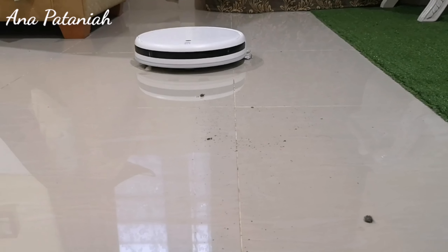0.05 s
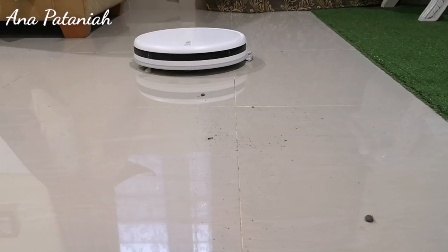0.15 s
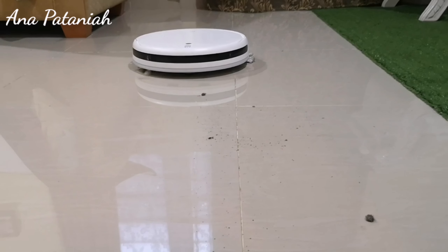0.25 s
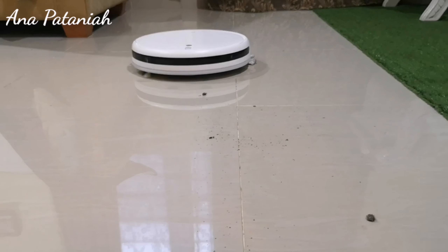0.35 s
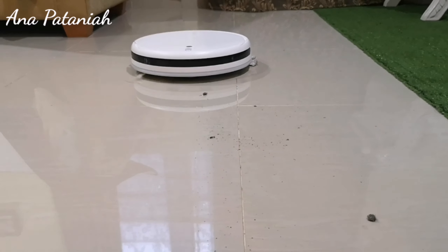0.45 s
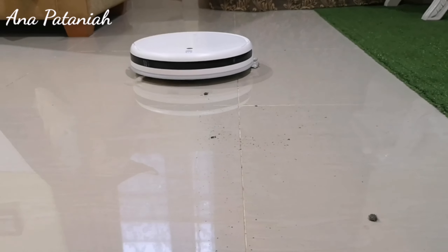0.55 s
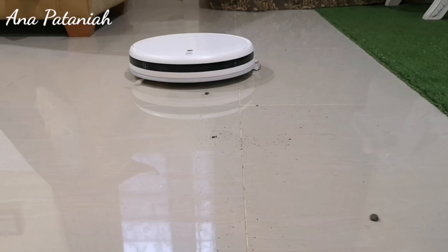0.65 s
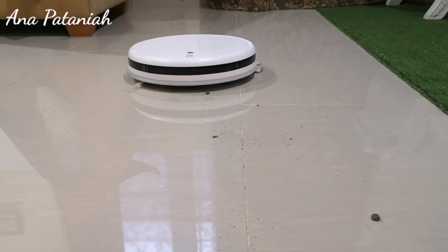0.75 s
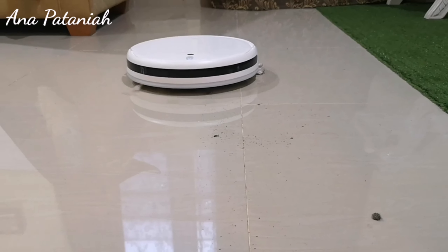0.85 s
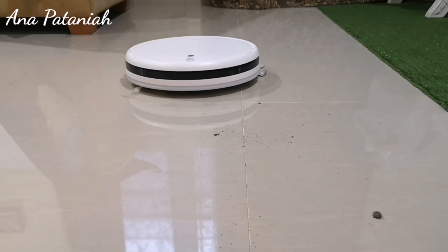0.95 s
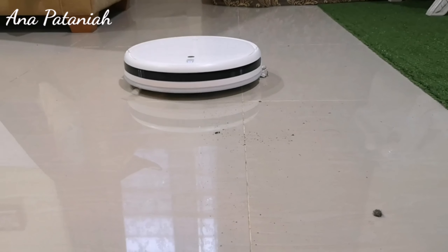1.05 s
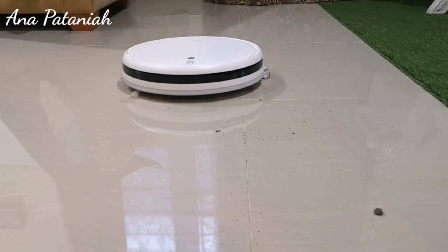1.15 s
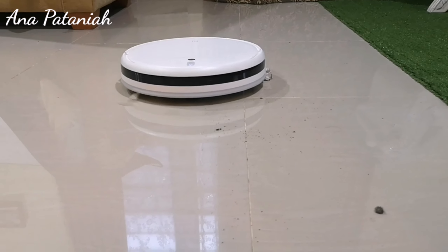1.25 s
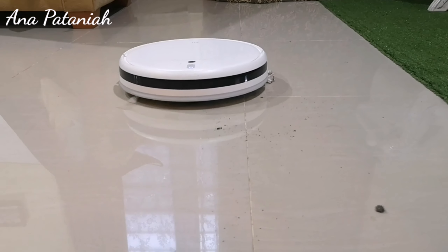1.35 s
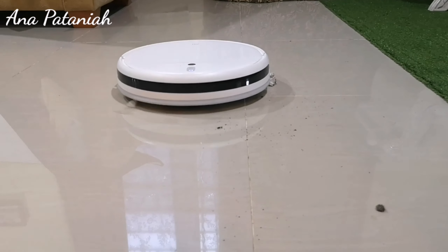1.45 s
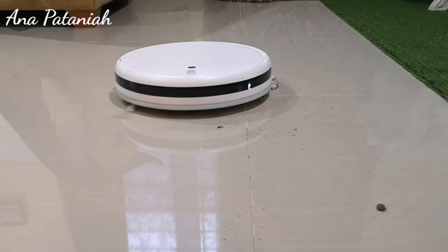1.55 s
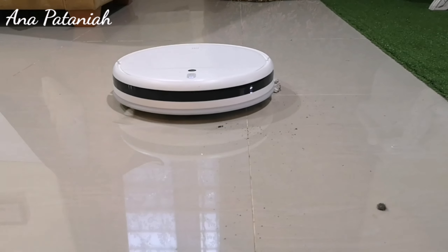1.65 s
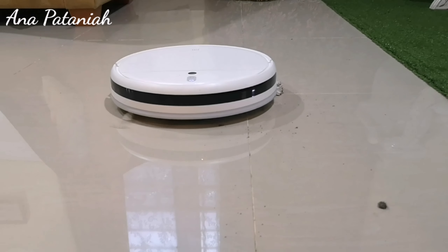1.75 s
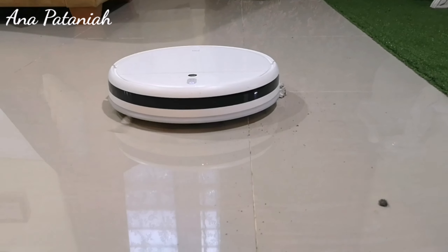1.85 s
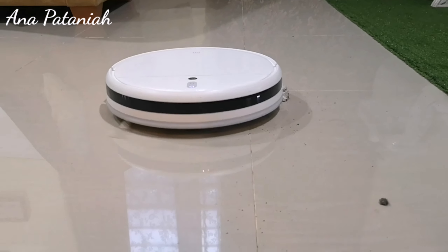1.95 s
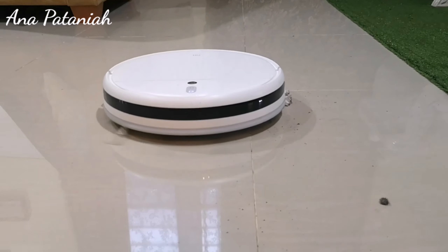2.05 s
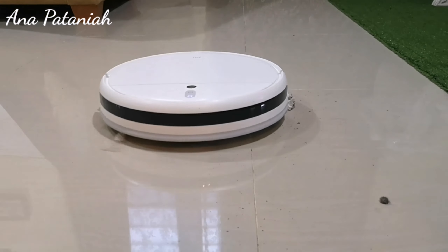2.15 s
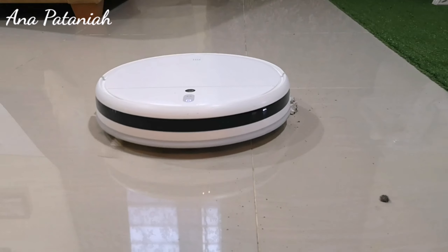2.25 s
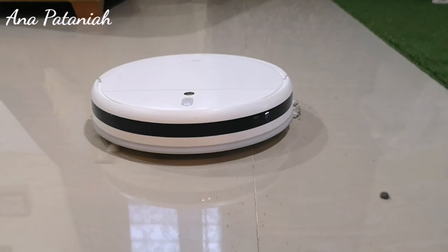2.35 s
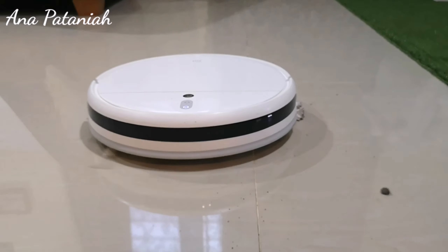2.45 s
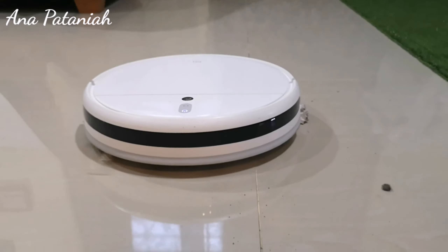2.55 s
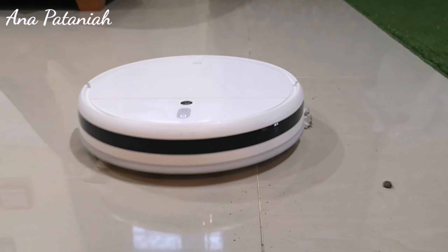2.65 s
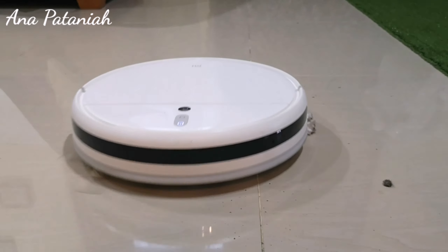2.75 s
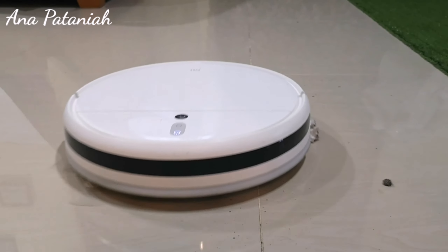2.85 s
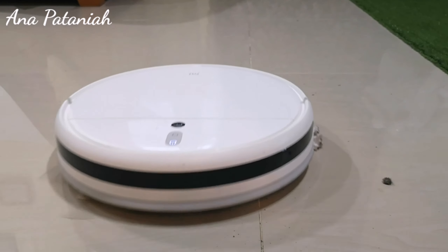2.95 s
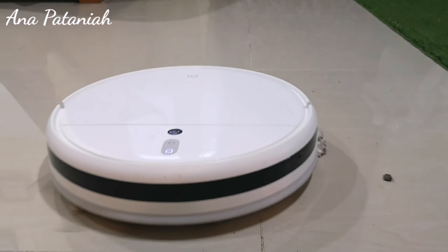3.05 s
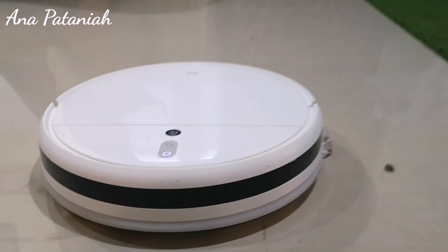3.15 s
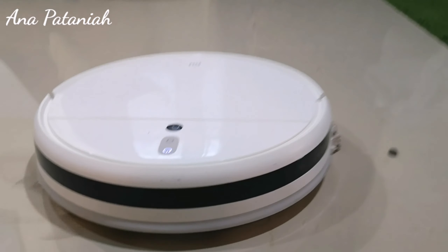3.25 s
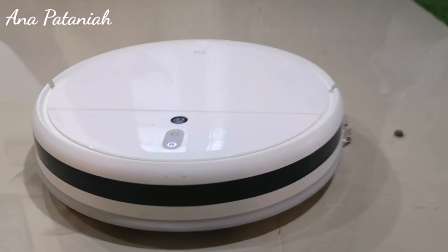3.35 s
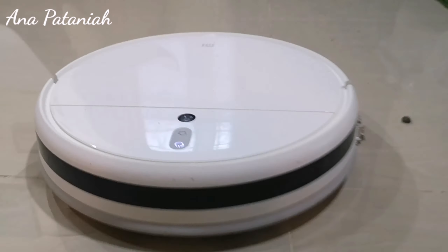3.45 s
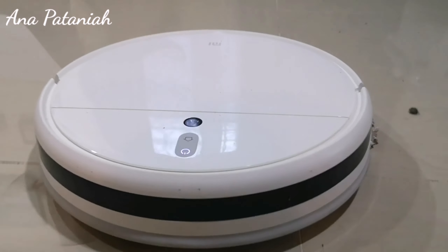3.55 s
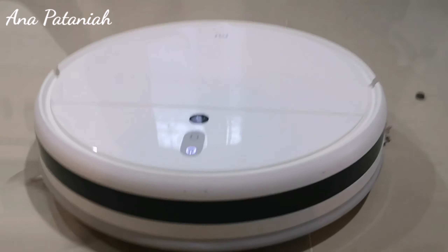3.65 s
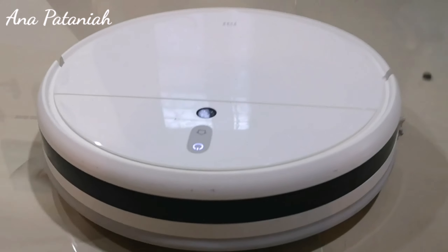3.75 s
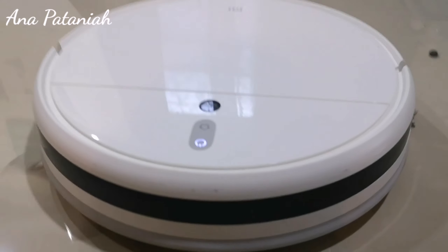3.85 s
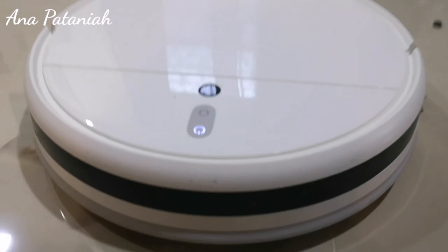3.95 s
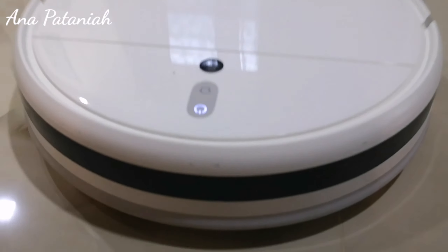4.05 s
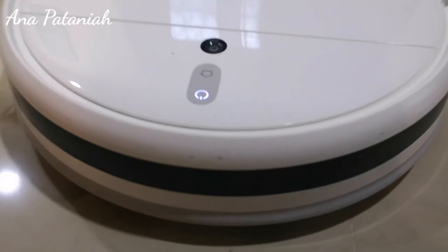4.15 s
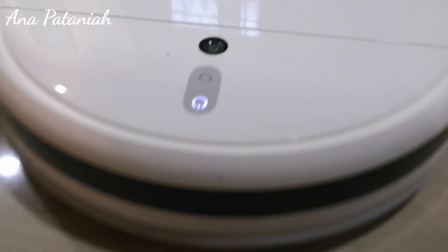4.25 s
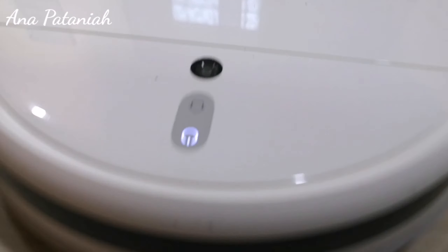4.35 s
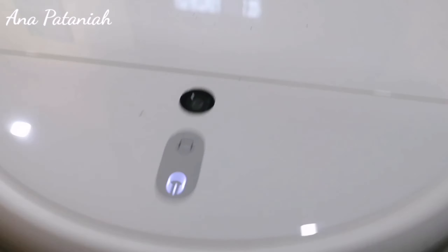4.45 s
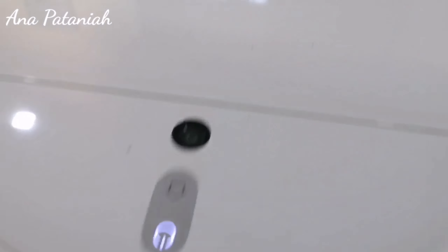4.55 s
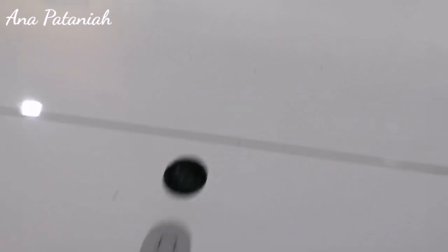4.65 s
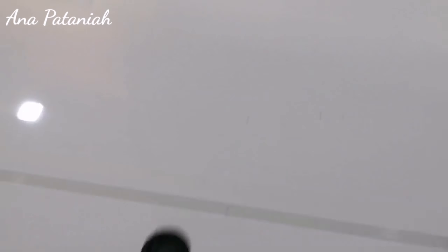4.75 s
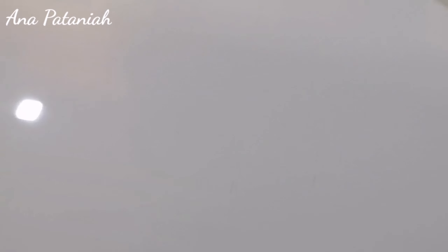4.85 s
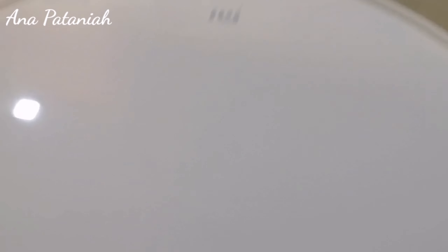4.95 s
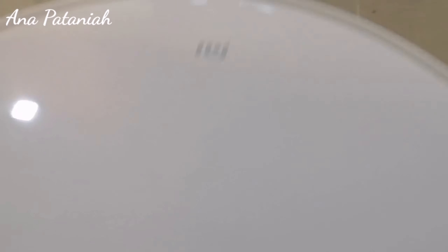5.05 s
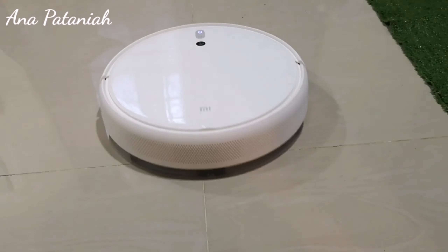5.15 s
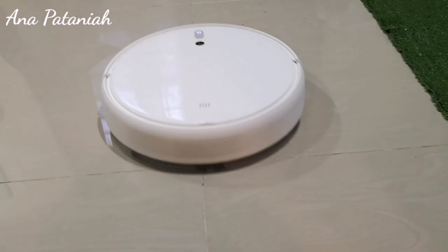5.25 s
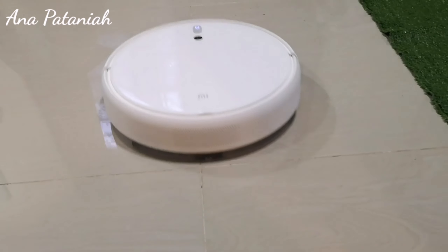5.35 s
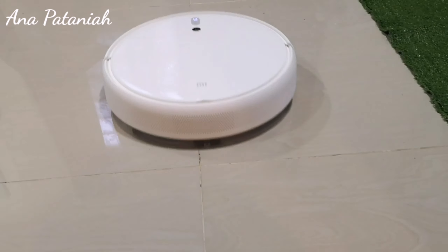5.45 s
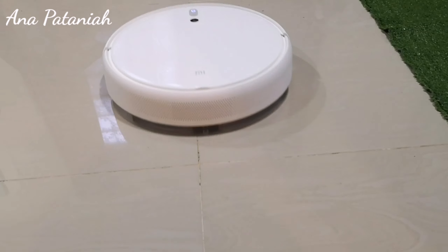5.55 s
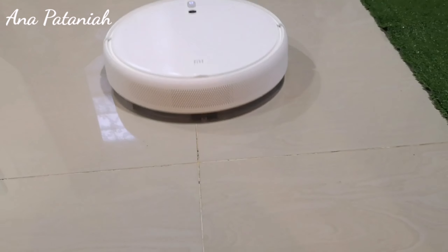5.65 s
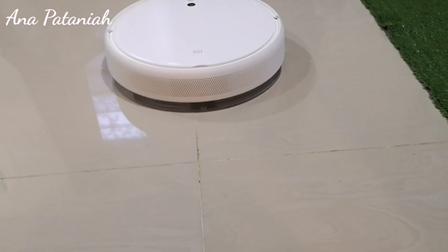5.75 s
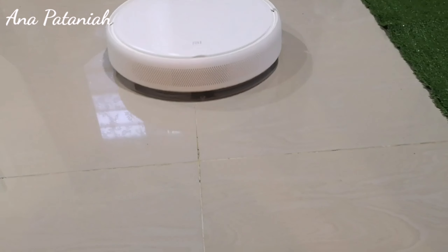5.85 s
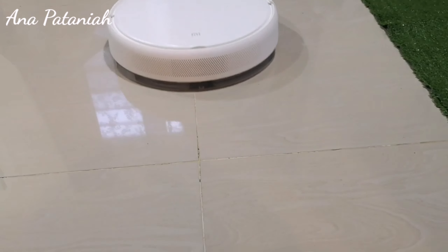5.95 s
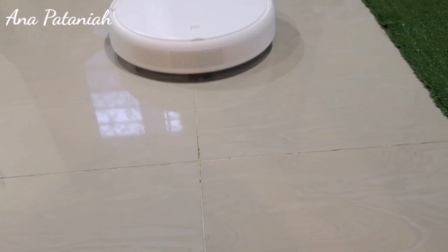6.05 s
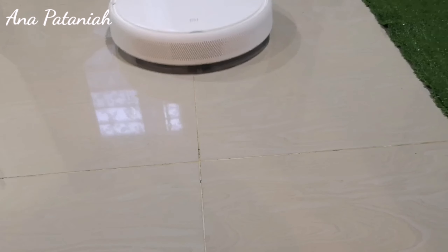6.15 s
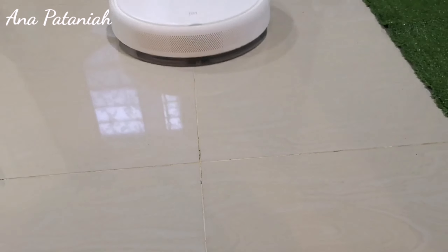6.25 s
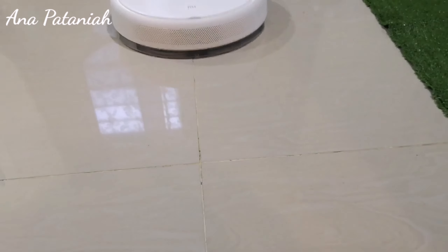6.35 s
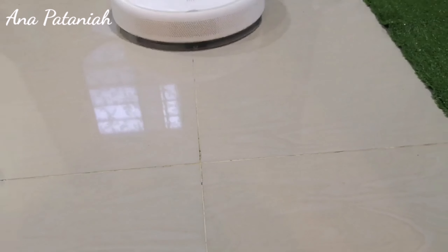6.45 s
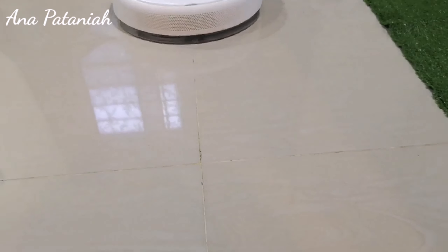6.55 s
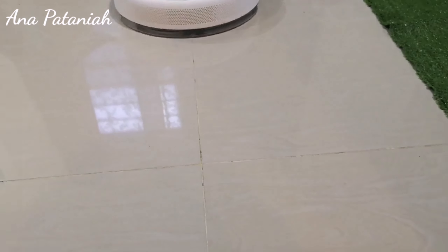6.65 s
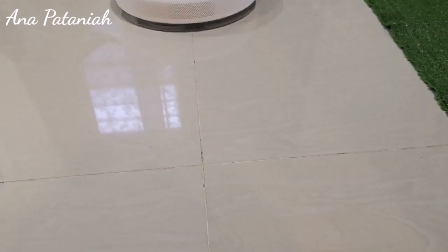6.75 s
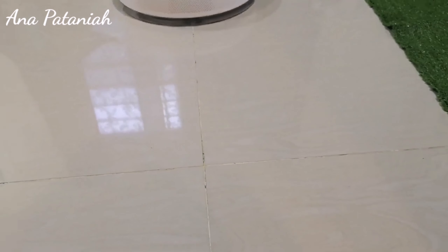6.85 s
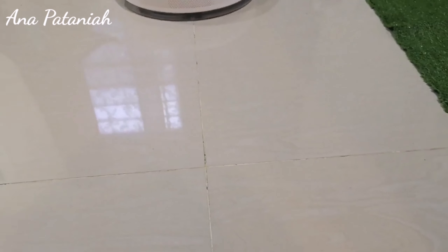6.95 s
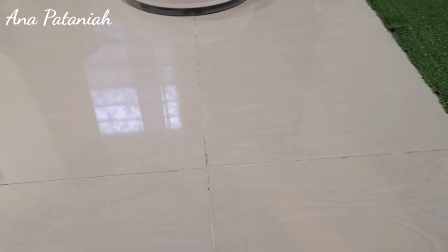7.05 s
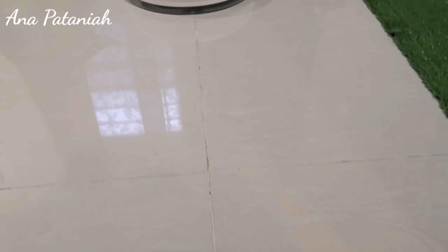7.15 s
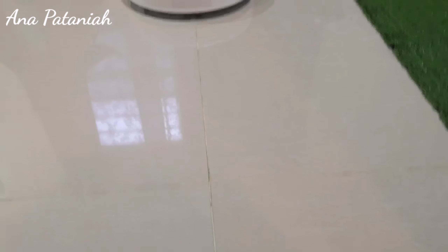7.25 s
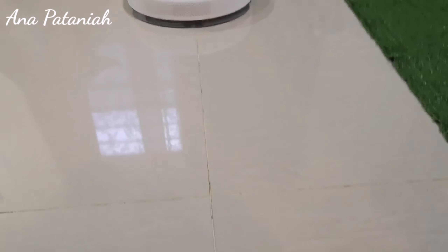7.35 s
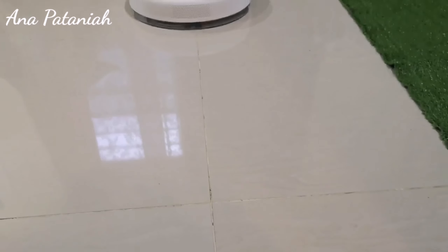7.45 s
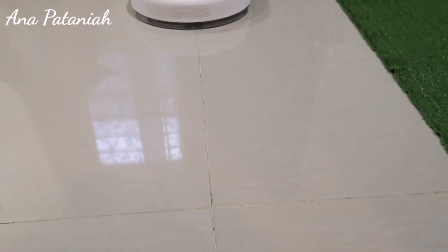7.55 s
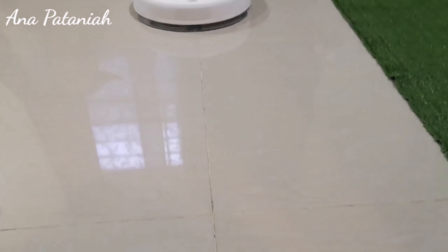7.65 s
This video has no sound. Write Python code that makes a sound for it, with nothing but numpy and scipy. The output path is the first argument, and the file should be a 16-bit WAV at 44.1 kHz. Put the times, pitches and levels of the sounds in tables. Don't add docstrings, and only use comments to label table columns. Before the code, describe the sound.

A robot vacuum rolls across a tiled room towards a hand-held phone. Its thin, high gear whine, low airy roar and soft bristle hiss grow steadily louder, with small grit ticks and one sharp knock midway. It passes close beneath, then the sound fades fast to a short silence. It returns abruptly, slightly lower in pitch and softer, moving off.

```python
import sys
import numpy as np
from scipy import signal
from scipy.fft import rfft, irfft, next_fast_len
from scipy.io import wavfile
from scipy.ndimage import uniform_filter1d

SR = 44100
rng = np.random.default_rng(int(sys.argv[2]) if len(sys.argv) > 2 else 0)


def pcm_store(signal):
    levels = np.round(np.clip(np.atleast_2d(signal), -1, 1) * 32767)
    wavfile.write(sys.argv[1], SR, levels.astype(np.int16).T)


def attenuation_scalar(level_db):
    decades = np.asarray(level_db, float) / 20
    return 10 ** decades


N = 340011
STEP = 64
SLOW = np.arange(0, N + STEP, STEP)
MUTE_S = 5.365


def walk(rate):
    k = max(int(SR / rate / STEP), 1)
    steps = np.repeat(rng.standard_normal(len(SLOW) // k + 1), k)
    smooth = uniform_filter1d(uniform_filter1d(steps, k), k)
    return 1.3 * smooth[:len(SLOW)]


def curves(tables):
    s, *columns = np.concatenate(tables).T
    return [np.interp(SLOW / SR, s, c) for c in columns]


def on_log(table, hz):
    f, v = np.transpose(table)
    return np.interp(np.log(hz), np.log(f), v)


def fine(slow, span=slice(0, N)):
    between = np.arange(STEP) / STEP
    return (slow[:-1, None] + np.diff(slow)[:, None] * between).ravel()[span]


def spin(table, hunt, rate):
    hz = curves([table])[0] * (1 + hunt * walk(rate))
    return np.cumsum(fine(hz)) / SR


def by_view(pair):
    return np.where(SLOW < MUTE_S * SR, *pair)


def swells(rows):
    return sum(db * np.exp(-.5 * ((SLOW / SR - s) / long) ** 2) for s, db, long in rows)


# t/s, distance/m, left minus right level/dB
PATH_OF_MACHINE = [
    [(0, 1.47, -1), (1.2, 0.98, -1.5), (1.45, 0.97, -2.5), (1.8, 0.7, -4), (2.4, 0.75, -3.5),
     (3.45, 0.52, -2), (3.6, 0.57, -2.5), (4.0, 0.46, -4.5), (4.1, 0.53, -3.5), (4.6, 0.43, -3),
     (5.28, 0.38, -3.5)],
    [(5.56, 0.81, 0), (5.8, 0.74, 1.5), (6.6, 0.91, 2.5), (7.71, 1.23, 3.5)],
]


def nearness():
    return -20 * np.log10(np.maximum(curves(PATH_OF_MACHINE)[0], .1))


def tone(turns, db, pan_db, wobble_db=0.5, blur=0.18, across=0.24):
    lean = np.tanh(pan_db * np.log(10) / 40 + 1.2 * across * walk(1.2))
    side = lean + 1j * across * np.sqrt(1 - lean ** 2)
    level = np.sqrt(2) * attenuation_scalar(db + wobble_db * walk(4.05))
    mid = level * np.exp(1j * (2 * np.pi * rng.random() + blur * walk(12)))
    carrier = np.exp(2j * np.pi * turns)
    return np.array([(fine(g) * carrier).imag for g in (mid * (1 + side), mid * (1 - side))])


def hum():
    return tone(48.5 * np.arange(N) / SR, -66.0, 0, 2.5, .4, .05)


# delay/ms, drift/ms, gain
EARLY_ECHOES = [
    (1.9, .3, .13),
    (3.1, .6, .16),
    (5.3, .9, .18),
]


def echoes(x):
    now = np.arange(N)
    out = x.copy()
    bright = x - uniform_filter1d(x, size=48)
    for ms, drift_ms, gain in EARLY_ECHOES:
        then = now - fine(ms + drift_ms * walk(0.5036)) * SR / 1000
        out += gain * np.array([np.interp(then, now, port) for port in bright])
    return out / np.sqrt(1 + sum(e[2] ** 2 for e in EARLY_ECHOES))


# f/Hz, side level under mid/dB
NOISE_WIDTH = [
    [(60, -30.5), (110, -25), (200, -15.5), (380, -3), (700, -0.5), (1290, -7.5), (2380, 2), (4400, -1),
     (8120, 0.5), (15000, 0)],
    [(60, -36), (110, -28.5), (200, -27), (380, -5), (700, -1.5), (1290, -11), (2380, -3), (4400, 1.5),
     (8120, 2.5), (15000, 1)],
]
# f/Hz, left minus right level/dB
NOISE_LEAN = [
    [(60, -1), (110, 0.5), (200, -0.5), (380, 3), (700, 9), (1290, -1.5), (2380, -2), (4400, -3.5),
     (8120, 2), (15000, -44.5)],
    [(60, 4), (110, 0), (200, -0.5), (380, 2), (700, 7), (1290, -0.5), (2380, -2.5), (4400, -0.5),
     (8120, 10), (15000, -11.5)],
]
# f/Hz, level/dB gained per dB of nearness, level/dB gained as the exhaust swings past
NOISE_PARTS = [(90, 0.54, -2), (298, 1.25, 6), (516.5, 0.85, -0.5), (1300, 1.02, 1), (2200, 0.71, 4),
               (3340, 0.58, 3), (4980, 1.13, -4.5), (12050, 0.73, 1.5)]
# t/s, f/Hz, level/dB, length/s
NOISE_PATCHES = [(0.6, 2500, 5, 0.14), (1.9, 1700, 6, 0.14), (2.4, 7900, 2, 0.36), (4.598, 1040, -8.5, 0.2),
                 (4.7, 6000, 4.5, 0.27), (4.7, 1610, -6.5, 0.13), (4.65, 2300, 3.5, .12),
                 (5.22, 1900, 1, .08), (5.85, 800, -3, .15), (4.7, 3000, 2.5, .1), (7.05, 3100, 3, 0.28),
                 (6.17, 2400, 1.5, .07), (6.5, 2400, 2.5, 0.077), (7.1, 800, 4, 0.18), (4.9, 1030, 5, .12),
                 (7.6, 1020, -3, .1), (7.0, 1840, 2.5, .4), (1.4, 2100, 3, 0.48), (3.9, 8200, -2.5, .06),
                 (5.2, 3230, 5, .12), (2.95, 1593, -1, 0.095), (1.5, 790, 8, 0.099), (4.1, 1200, -4.5, 0.18),
                 (6, 2400, 1.5, 0.19), (5.4, 2351, 3.5, 0.11), (6.5, 955, -0.5, .3), (6.6, 2600, -0.5, .2),
                 (7.005, 1620, 3.5, 0.42)]
PATCH_OCTAVES = 0.15


def turbulence(shape, view, span, gain_db, flicker_db, lag_share=.8, lag_hz=3500):
    size = span.stop - span.start
    fast = next_fast_len(size)
    hz = np.maximum(np.arange(fast // 2 + 1) * SR / fast, 1)
    main, other = (rfft(rng.standard_normal(fast)) for _ in range(2))
    mid = attenuation_scalar(on_log(shape, hz))
    mid = mid / np.sqrt(np.mean(mid ** 2))
    wide = attenuation_scalar(on_log(NOISE_WIDTH[view], hz))
    tilt = np.tanh(on_log(NOISE_LEAN[view], hz) * np.log(10) / 20)
    lean = np.clip((1 + wide ** 2) / (2 * wide) * tilt, -.9, .9)
    late = np.clip(lag_share * np.exp(-hz / lag_hz), 0, 1) * np.sqrt(1 - lean ** 2)
    side = wide * ((lean + 1j * late) * main + np.sqrt(1 - lean ** 2 - late ** 2) * other)
    pair = mid * np.array([main + side, main - side])
    thirds = 3 * np.log2(hz)
    octaves = np.log2(shape[-1][0] / shape[0][0])
    part_hz = np.transpose(NOISE_PARTS)[0]
    out = 0
    for centre in shape[0][0] * 2 ** np.arange(0, octaves + 1 / 3, 1 / 3):
        if on_log(shape, centre) < -40:
            continue
        band = np.cos(np.pi / 2 * np.clip(thirds - 3 * np.log2(centre), -1, 1)) ** 2
        weights = [np.interp(np.log(centre), np.log(part_hz), row) for row in np.eye(len(NOISE_PARTS))]
        patches = swells([(s, g * np.exp(-.5 * (np.log2(centre / f) / PATCH_OCTAVES) ** 2), long)
                        for s, f, g, long in NOISE_PATCHES])
        db = weights @ gain_db + patches + flicker_db * walk(1.967) + 1.34 * walk(9)
        noise = irfft((pair * band).astype(np.complex64), fast)[:, :size]
        out = out + fine(attenuation_scalar(db), span) * noise
    return out


# f/Hz, level/dB per Hz
ROAR_COLOUR = [
    [(12, -32), (20, -1.5), (199, -1.5), (275, -10), (388, -12.5), (584, -19), (823, -15.5), (957, -6.5),
     (1270, -13), (1410, -9), (1540, -8), (2170, -10.5), (2520, -11), (2740, -9), (3400, -16.5),
     (4420, -32), (7480, -120)],
    [(12, -29), (20, -2), (144, -4.5), (204, 0.5), (281, -6), (372, -4.5), (584, -26.5), (940, 0.5),
     (1190, -12.5), (1470, -8.5), (1600, -1.5), (1740, -7), (1880, -8), (2030, -5.5), (2190, -7.5),
     (2350, 2), (2500, 0), (2600, -7.5), (2800, -9.5), (3050, -17.5), (3400, -25), (4420, -37),
     (7480, -120)],
]
# f/Hz, level/dB per Hz
HISS_COLOUR = [
    [(1830, -40.5), (2900, -8), (2960, -8.5), (3350, -10), (5300, -8.5), (6480, -13.5), (7550, -11.5),
     (9040, -12), (11900, -23), (13900, -24.5), (15200, -25.5)],
    [(1710, -37), (2900, -10.5), (3470, -11.5), (3830, -5.5), (4400, -11), (5720, -7.5), (6350, -15.5),
     (7800, -7), (8200, -11), (8650, -7), (9620, -17), (10200, -17.5), (11900, -24), (13500, -26),
     (15200, -30)],
]
# t/s, rumble level/dB, length/s
TILE_JOINTS = [
    (.6, 3, 0.069),
    (1.2, 6, 0.088),
    (1.52, 5.5, 0.13),
    (2.88, 3.5, 0.069),
    (4.3, 3, .2),
    (7.55, 6, 0.091),
]
# t/s, upper roar level/dB, length/s
DUST_RUSTLES = [
    (1.5, 3.5, 0.053),
    (1.8, 1.5, .1),
    (4.0, 4.5, 0.11),
    (4.63, 3, 0.098),
    (5.85, -0.5, .2),
    (6.33, 0, 0.16),
]
ROAR_DB, HISS_DB = [-43.5, -42.5], [-48, -54]
BEAT_DEPTH = [0.15, 0.04]
EXHAUST_FROM_S, EXHAUST_TURN_S = 4.16, 1


def air(roller):
    pan_db = curves(PATH_OF_MACHINE)[1]
    exhaust = np.clip((SLOW / SR - EXHAUST_FROM_S) / EXHAUST_TURN_S, 0, 1)
    levels = np.array([slope * nearness() + db * exhaust for _, slope, db in NOISE_PARTS])
    levels[0] += swells(TILE_JOINTS)
    levels[3:5] += swells(DUST_RUSTLES) * np.array([[.3], [1.01]])
    roar, hiss = np.zeros((2, 2, N))
    change = int(MUTE_S * SR)
    for view, span in enumerate([slice(0, change), slice(change, N)]):
        inside = slice(span.start // STEP, span.stop // STEP)
        gain_db = levels - np.median(levels[:, inside], axis=1, keepdims=True)
        turn = 2 * np.pi * roller[span]
        rows = np.cos(3 * turn) + 0.7 * np.cos(6 * turn) + 0.33 * np.cos(2 * turn)
        beat = 1 + BEAT_DEPTH[view] * rows
        lean = fine(pan_db - np.median(pan_db[inside]), span) / 2
        bristles = turbulence(HISS_COLOUR[view], view, span, gain_db + HISS_DB[view], 0.15)
        hiss[:, span] = bristles * beat * attenuation_scalar(np.array([lean, -lean]))
        roar[:, span] = turbulence(ROAR_COLOUR[view], view, span, gain_db + ROAR_DB[view], 1.5)
    return hiss + echoes(roar)


# t/s, peak level/dB, ring f/Hz, left minus right level/dB, t60/s
GRIT_KNOCKS = [(1.451, -30, 1780, -5, .011), (1.516, -34, 1950, -4, .010), (1.553, -37, 1950, -4, .010),
               (1.700, -35, 1800, -4, .010), (1.730, -35, 1750, -4, .010), (1.782, -35, 1800, -4, .009),
               (1.815, -34, 1750, -4, .009), (1.869, -32, 1560, -5, .010), (1.870, -30.5, 1030, -5, .011),
               (1.919, -33, 1780, -4, .008), (3.5232, -18.8, 1965, -4, .014),
               (3.523, -26.5, 1180, -3, .011), (3.525, -30.5, 760, -1, .011), (3.538, -30, 1950, -2, .012),
               (3.548, -33, 1500, -2, .008), (3.555, -31, 1650, -3, .013), (3.566, -32, 1600, -3, .010),
               (3.963, -23, 1250, -1, .008), (4.005, -32, 1800, -1, .008), (4.507, -32, 1590, -1, .008),
               (4.542, -30, 1590, -2, .008), (4.67, -29, 2320, 0, .008)]


def grit():
    out, t = np.zeros((2, N)), np.arange(2600) / SR
    modes = [(1, 1), (1.19, .7), (.8, .2), (.6, .16), (2.35, .1), (1.09, .2)]  # (times ring Hz, gain)
    lots = rng.random((len(GRIT_KNOCKS), len(modes) + len(t)))
    for (s, db, hz, pan_db, t60), lot in zip(GRIT_KNOCKS, lots):
        ring = sum(g * np.sin(2 * np.pi * (r * hz * t + p)) for (r, g), p in zip(modes, lot))
        around = signal.butter(2, [hz / 1.5, hz * 1.6], "band", fs=SR, output="sos")
        scrape = signal.sosfilt(around, lot[len(modes):] - .5)
        ring = ring + .35 * scrape / scrape.std()
        rise = np.minimum(t / t60 * 4, 1)
        decay = np.exp(-np.log(1000) * np.maximum(t - t60 / 2, 0) / max(t60, .004))
        ring = ring * rise * decay
        at = int(s * SR) - 110
        port_db = db - 2.0 + np.array([[pan_db], [-pan_db]]) / 2
        out[:, at:at + len(t)] += attenuation_scalar(port_db) * ring / np.abs(ring).max()
    return out


# t/s, f/Hz
WHEEL_PITCH = [(0, 1437), (.5, 1428), (1.1, 1415), (1.5, 1431), (2.4, 1439), (3.5, 1434), (4.3, 1440),
               (4.9, 1426), (5.3, 1435), (5.5, 1372), (5.95, 1394), (6.2, 1408), (6.8, 1428), (7.5, 1442),
               (7.71, 1440)]
# t/s, level/dB, length/s
WHEEL_STRAIN = [(.1, 5.5, 0.16), (.58, 8, .09), (.85, 3.5, 0.11), (1.08, 4.5, 0.1), (1.3, 0, .05),
                (1.66, 4.5, 0.06), (2.6, 6, 0.23), (3.45, 8, 0.41), (4.15, -4, .15), (4.56, 3.5, 0.062),
                (4.9, 7.5, .17), (5.2, -2.5, 0.064), (5.8, 0.5, .2), (7.5, 2.5, .12)]


def wheel():
    db = by_view((-55, -56)) + 0.18 * nearness() + swells(WHEEL_STRAIN)
    turns = spin(WHEEL_PITCH, .0058, 30)
    pan_db = -4 + 5 * walk(2.95)
    return tone(turns, db + 2.0 * walk(22), pan_db, 0.9, 0.98)


# t/s, shaft order level/dB, eighth order level/dB
FAN_LEVELS = [
    [(0, -71, -68), (.35, -66, -75), (.79, -67.5, -70), (1.16, -51.5, -68), (1.44, -61, -61),
     (1.75, -48.5, -55), (2.05, -53, -57), (2.35, -51, -60), (2.6, -49.5, -56), (2.78, -54, -66),
     (2.95, -46, -56), (3.3, -48, -54), (3.58, -56.5, -54), (3.68, -40.5, -50), (3.82, -45.5, -56),
     (4.06, -61, -68), (4.29, -42, -56), (4.58, -45, -46.5), (4.75, -46, -50.5), (5.05, -50.5, -50),
     (5.15, -50, -64), (5.28, -51, -62)],
    [(5.56, -51, -54), (6.5, -53, -54), (6.75, -54, -51.5), (7.1, -57, -53), (7.35, -52.5, -55),
     (7.71, -64, -59)],
]
# t/s, f/Hz
FAN_SPEED = [(0, 198.5), (5.3, 198.5), (5.5, 198.28), (7.71, 198.28)]
FAN_LOW_LEVELS = [-7, -12.5, -9.5, -15, -8, -14.5]
LOW_ORDERS = [.5, 4, 5, 9, 10, 19]
BLADE_MULTIPLES = [36, 37, 39, 40, 43, 47, 54, 72]
# level/dB from the front, level/dB from behind
BLADE_LEVELS = [(-3, -1.5), (-17, -14), (-2, -11), (-1.5, -9), (-11, -4.5), (0.5, -3.5), (-22.5, -19),
                (-14, -13)]
BLADES_SHADED_S, BLADES_SHADE_DB = 3.4, -11
COMB_FIRST, COMB_LAST = 60, 76


def fan():
    shaft_db, eighth_db = curves(FAN_LEVELS)
    shade = np.clip((SLOW / SR - BLADES_SHADED_S) / 0.33, 0, 1) * by_view((1, 0))
    blade_db = by_view((-68, -66.5)) + nearness() + BLADES_SHADE_DB * shade
    turns = spin(FAN_SPEED, by_view((.0024, .00025)), 5)
    imbalance = tone(turns, shaft_db - 2.5 + 2.6 * walk(14), 0, 1.3, 1.3, 0.14)
    eighth = tone(8 * turns, eighth_db + 1.5, -2.4, 0.67)
    low = sum(tone(k * turns, eighth_db + db, 0, across=min(.3, 0.15 * k))
              for k, db in zip(LOW_ORDERS, FAN_LOW_LEVELS))
    blades = sum(tone(k * turns, blade_db + by_view(db), -1.5, 2.5)
                 for k, db in zip(BLADE_MULTIPLES, BLADE_LEVELS))
    shaft, comb = np.exp(2j * np.pi * turns), 0
    for _ in range(COMB_FIRST, COMB_LAST + 1):
        whistle = attenuation_scalar(3 * rng.standard_normal((2, 1))) * np.exp(2j * np.pi * rng.random())
        comb = (comb + whistle) * shaft
    comb = (comb * np.exp(2j * np.pi * (COMB_FIRST - 1) * turns)).imag
    comb_db = blade_db + by_view((-29, -24)) + 1.5 * walk(4)
    return imbalance + eighth + low + blades + np.sqrt(2) * fine(attenuation_scalar(comb_db)) * comb


# t/s, level/dB, left minus right level/dB
MESH_LEVELS = [
    [(0, -59.5, -17), (.5, -48.5, -30), (.7, -53, 2), (1.0, -53.5, -16), (1.08, -62, 0), (1.19, -52.5, 1),
     (1.32, -57, 0), (1.5, -57, 5), (1.85, -50, -3), (2.0, -54, -14), (2.14, -46, 1), (2.25, -45.5, -12),
     (2.45, -52, 1), (2.95, -42, 8.5), (3.3, -38.5, -2), (3.45, -43.5, -4), (3.7, -45, -13.5),
     (3.76, -68, -0.5), (3.88, -52, 4), (4.05, -42.5, -20.5), (4.17, -35.5, -37), (4.44, -37, -29),
     (4.6, -49.5, -11), (4.75, -42, -9), (4.97, -38, -9.5), (5.12, -45.5, -9.5), (5.28, -45, -2)],
    [(5.56, -53.5, -10), (7.71, -59.5, 1.1)],
]
# level/dB, level/dB per dB of nearness
MOTOR_LEVELS = [(1.5, 0.9), (-1, 1.93), (1.5, 1.5), (-3.5, 2.5), (3, .9), (-6, 2), (-5, 1.46)]
MOTOR_ORDERS = [3, 6, 9, 19, 21, 25, 42]
# t/s, level/dB, length/s
SIXTH_ORDER_FADES = [
    (1.2, 1, 0.26),
    (2.5, -9.5, .4),
    (3.9, -3, 0.089),
    (4.2, -0.5, 0.084),
    (4.95, -3.5, .1),
    (6.5, 5, 0.29),
]
TEETH = 22


def brush(motor, roller):
    db, pan_db = curves(MESH_LEVELS)
    beat = 1 + 0.17 * np.cos(4 * np.pi * roller) + 0.055 * np.cos(2 * np.pi * roller)
    mesh = tone(TEETH * motor, db, pan_db, 0.49, 0.9) * beat
    mesh = mesh * (1 + attenuation_scalar(-13) * fine(walk(340)))
    beside = np.maximum(db - 17.5, by_view((-62, -69)))
    orders = 0
    for k, (gain_db, slope) in zip(MOTOR_ORDERS, MOTOR_LEVELS):
        order_db = by_view((-69, -72.5)) + slope * nearness() + gain_db
        if k == 6:
            order_db = order_db + swells(SIXTH_ORDER_FADES)
        orders = orders + tone(k * motor, beside if k == TEETH - 1 else order_db, 0, 1.4)
    thrum = tone(6 * roller, by_view((-61, -66)) + nearness(), 0, 3.2, 0.93, .1)
    return mesh + orders + thrum


# t/s, f/Hz
MESH_PITCH = [(0, 2800), (2, 2804), (3.6, 2803), (4.2, 2799), (5.3, 2797), (5.5, 2722), (7.71, 2722)]


def scene():
    motor = spin(MESH_PITCH, 0.001498, 7) / TEETH
    roller = motor / 6.17
    return hum() + air(roller) + grit() + wheel() + fan() + brush(motor, roller)


# f/Hz, share of the band rms below which it vanishes
LOST_DETAIL = [(700, .05), (1200, .18), (2500, .26), (3000, .1), (3300, .36), (3800, .48), (6300, .58),
               (8500, .55), (9800, .68), (11500, .95)]
# f/Hz, level/dB under the whole sound where they start to vanish
DROWNED_BANDS = [(6000, -55), (7000, -59), (9000, -58), (10500, -49.5), (12000, -50), (15000, -51)]
DROWNED_SPREAD_DB, TOP_HZ = 6.5, 15140


def phone_thinning(x, size=1024, order=492):
    n, k = np.arange(2 * size)[:, None], np.arange(size)
    window = np.sin(np.pi * (n + .5) / (2 * size))
    basis = np.sqrt(2 / size) * window * np.cos(np.pi / size * (n + .5 + size / 2) * (k + .5))
    count = N // size + 3
    padded = np.pad(x, ((0, 0), (size - order, count * size - N - size + order)))
    hops = padded.reshape(2, count, size)
    coef = np.concatenate([hops[:, :-1], hops[:, 1:]], axis=2) @ basis
    hz = (k + .5) * SR / (2 * size)
    band = coef.reshape(2, count - 1, -1, 16).var(axis=3).repeat(16, axis=2) + 1e-20
    whole = np.sum(coef ** 2, axis=(0, 2))[:, None] / 2 + 1e-20
    under_db = 10 * np.log10(band.mean(axis=0) / whole)
    luck = uniform_filter1d(rng.standard_normal((count - 1, size // 8)), size=3, axis=0)
    luck = luck.repeat(8, axis=1) * np.sqrt(3)
    heard = under_db + DROWNED_SPREAD_DB * luck > on_log(DROWNED_BANDS, hz)
    keep = heard | (hz < DROWNED_BANDS[0][0])
    keep = keep & (coef ** 2 > band * on_log(LOST_DETAIL, hz) ** 2) & (hz < TOP_HZ)
    frames = (coef * keep) @ basis.T
    joined = frames[:, 1:, :size] + frames[:, :-1, size:]
    first = frames[:, :1, :size] + hops[:, :1] * np.cos(np.pi * (k + .5) / (2 * size)) ** 2
    return np.concatenate([first, joined], axis=1).reshape(2, -1)[:, size - order:][:, :N]


def roll_off(x):
    return signal.sosfilt(signal.butter(12, 15640, fs=SR, output="sos"), x)


def record(dry):
    t = np.arange(N) / SR
    fade = attenuation_scalar(-385 * np.clip(t - 5.284, 0, .1))
    cut = np.where(t < MUTE_S, fade, t >= 5.548)
    mix = phone_thinning(dry - .00057) * cut
    return roll_off(mix)


dry = scene()
out = record(dry)
pcm_store(out)
```